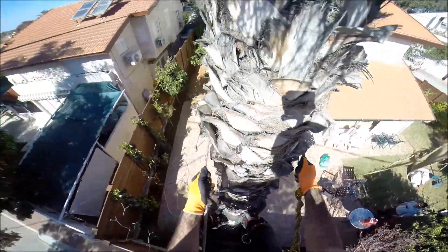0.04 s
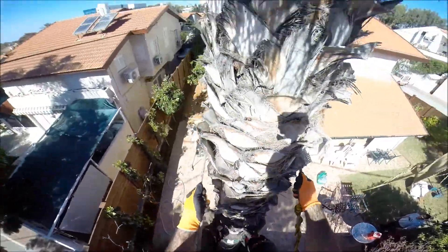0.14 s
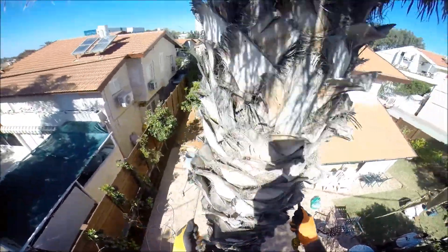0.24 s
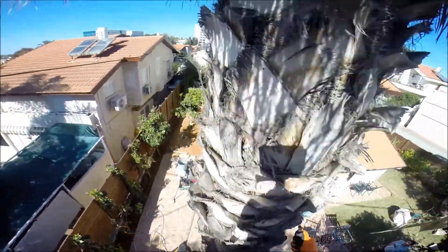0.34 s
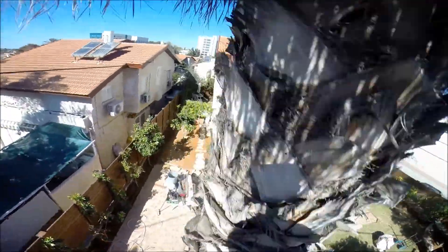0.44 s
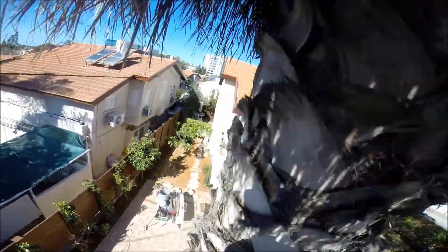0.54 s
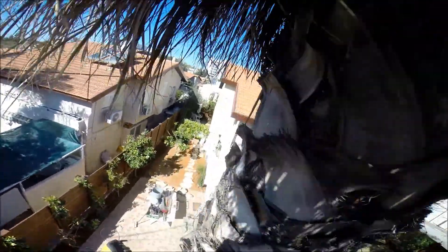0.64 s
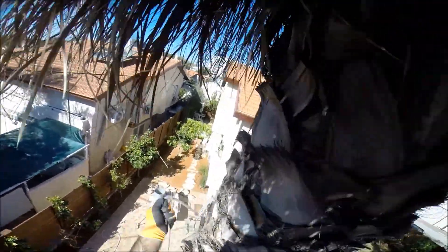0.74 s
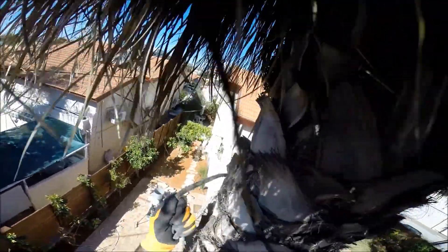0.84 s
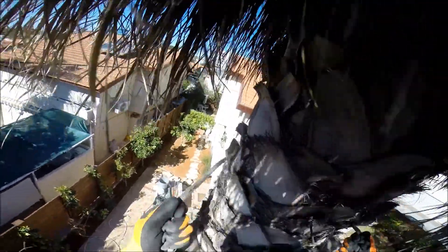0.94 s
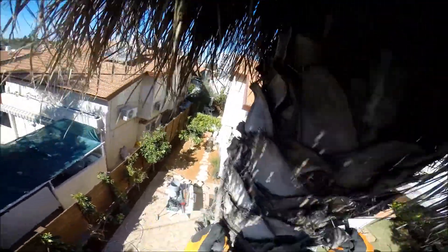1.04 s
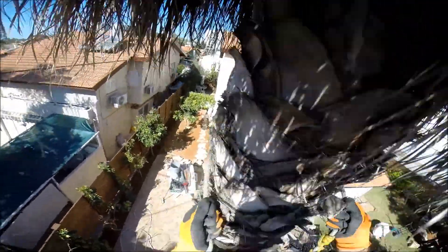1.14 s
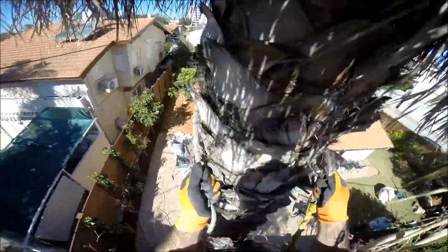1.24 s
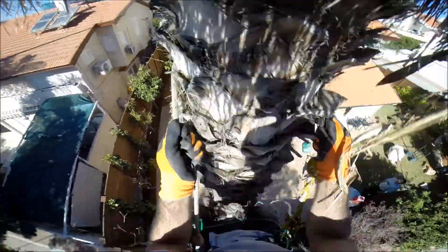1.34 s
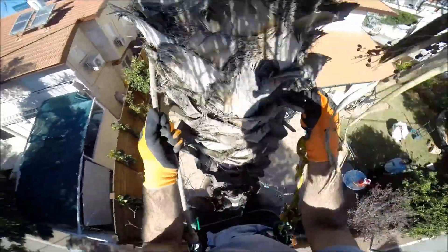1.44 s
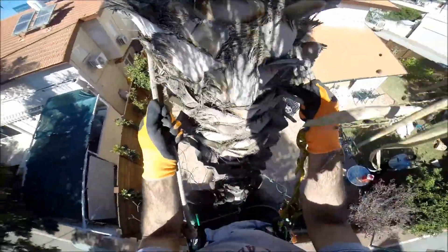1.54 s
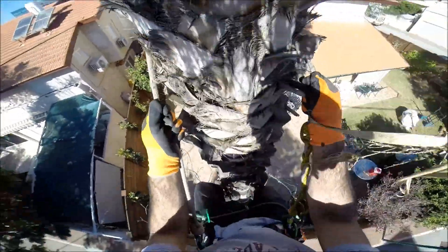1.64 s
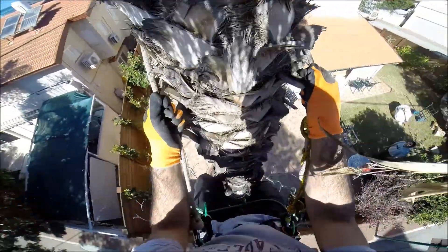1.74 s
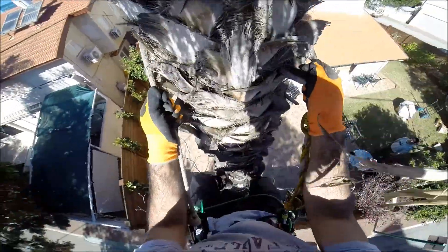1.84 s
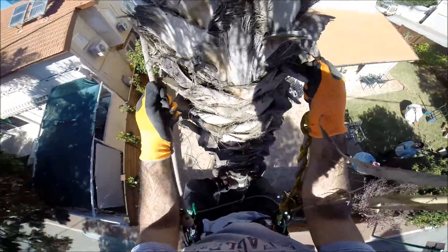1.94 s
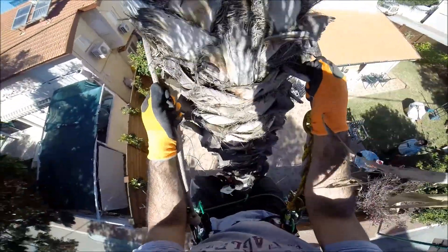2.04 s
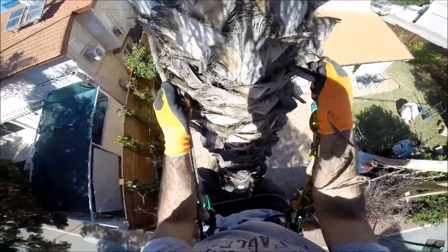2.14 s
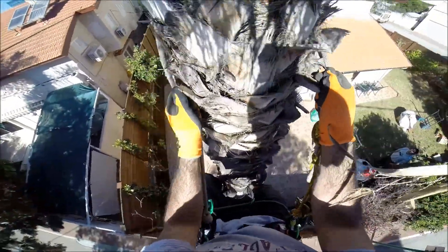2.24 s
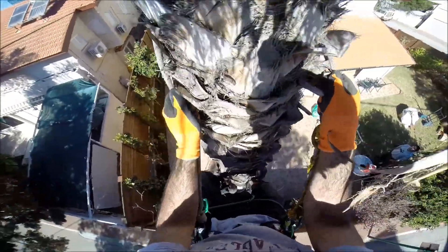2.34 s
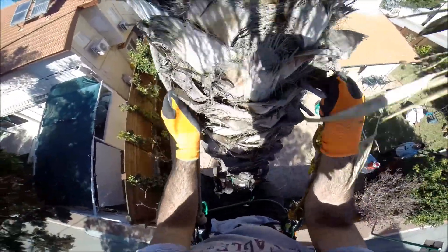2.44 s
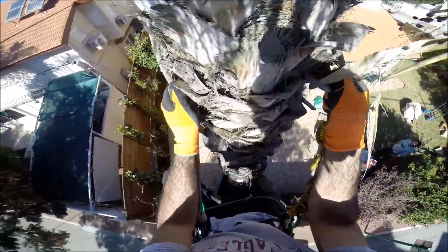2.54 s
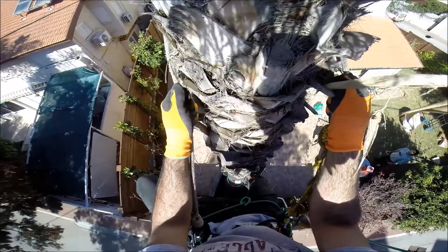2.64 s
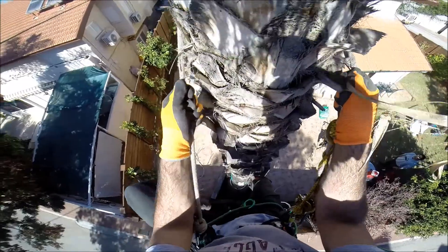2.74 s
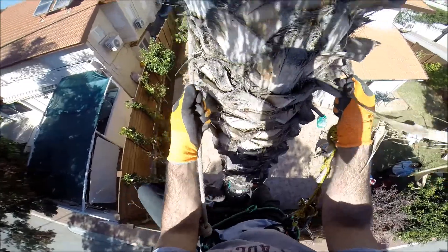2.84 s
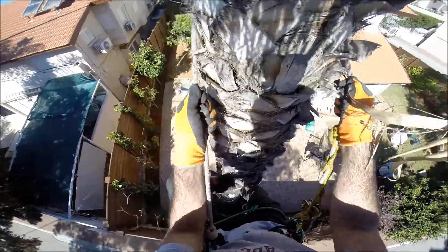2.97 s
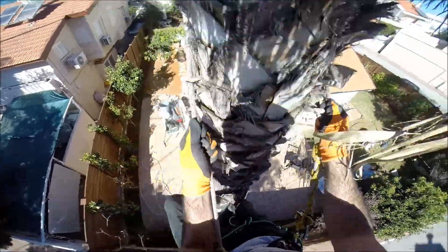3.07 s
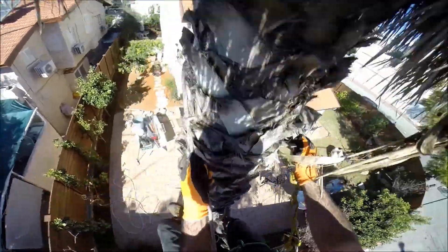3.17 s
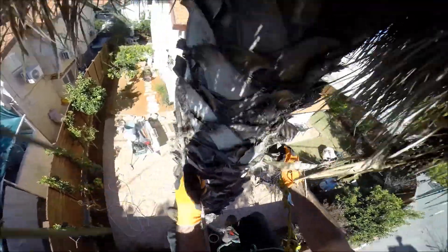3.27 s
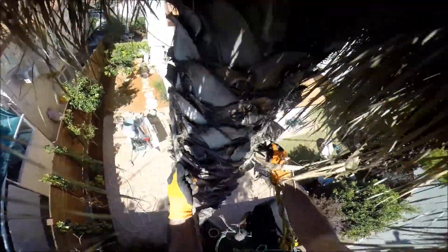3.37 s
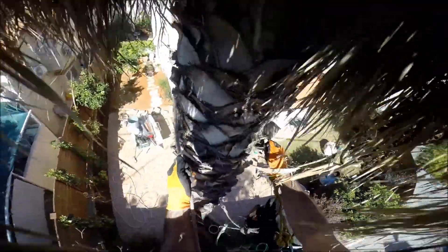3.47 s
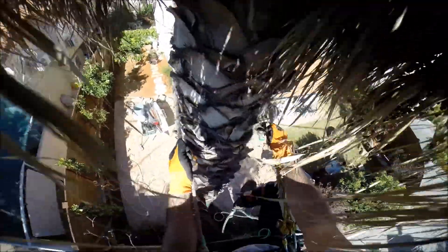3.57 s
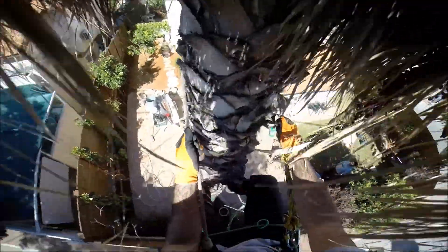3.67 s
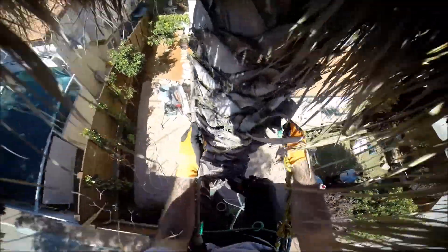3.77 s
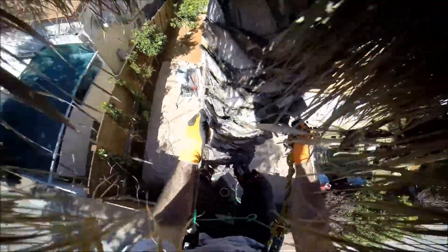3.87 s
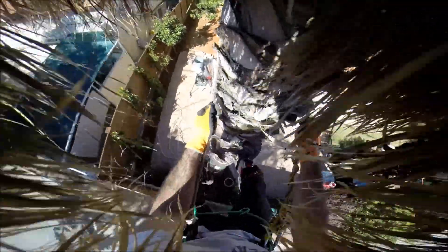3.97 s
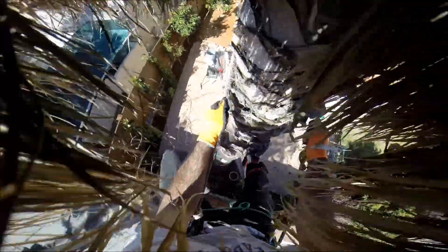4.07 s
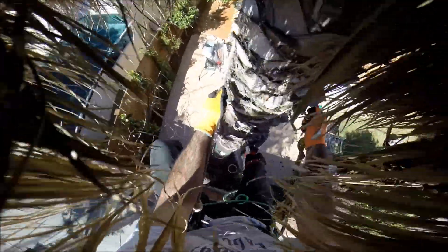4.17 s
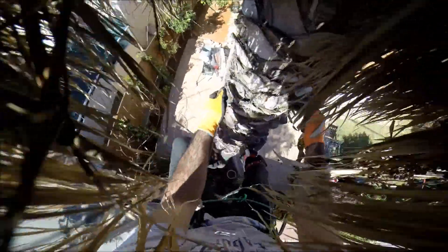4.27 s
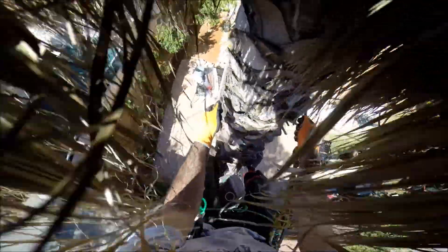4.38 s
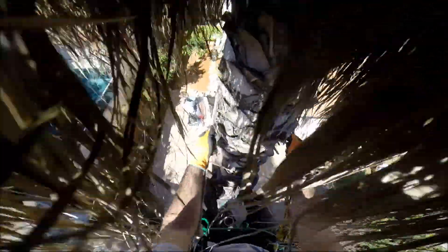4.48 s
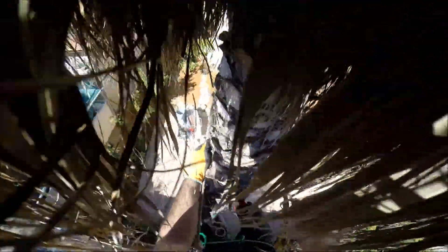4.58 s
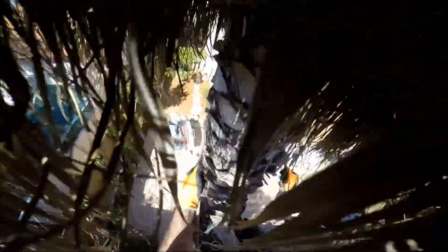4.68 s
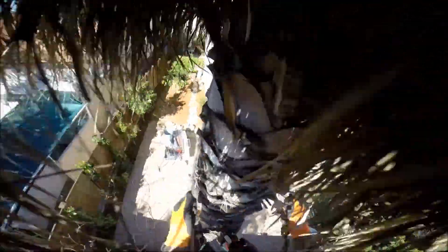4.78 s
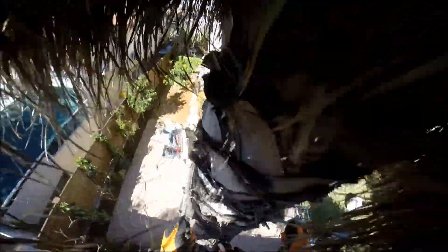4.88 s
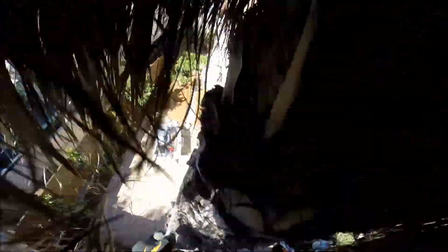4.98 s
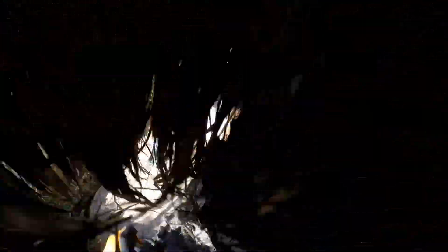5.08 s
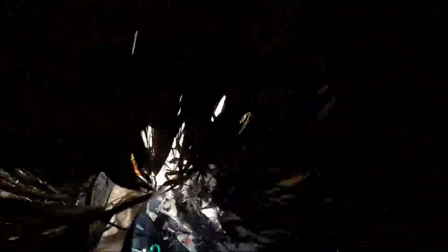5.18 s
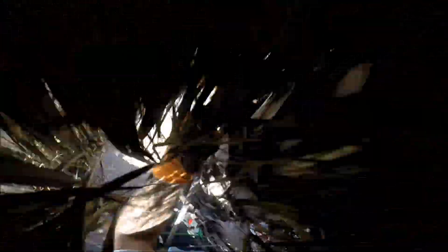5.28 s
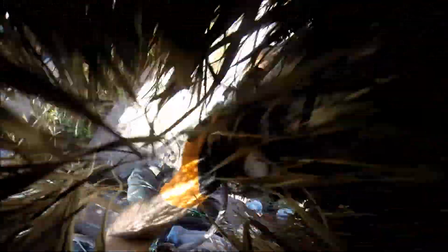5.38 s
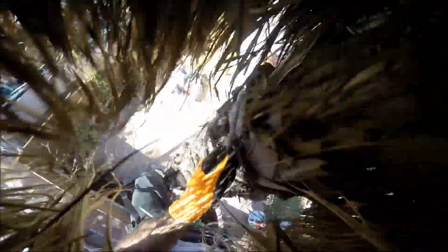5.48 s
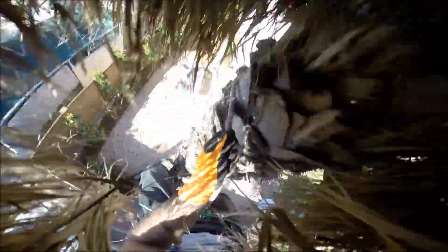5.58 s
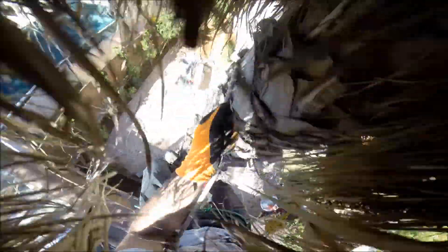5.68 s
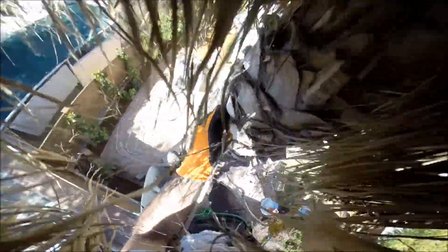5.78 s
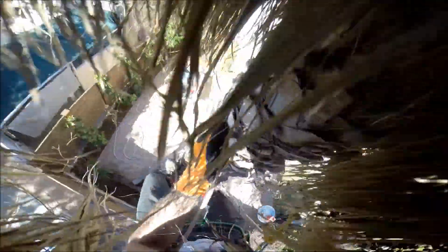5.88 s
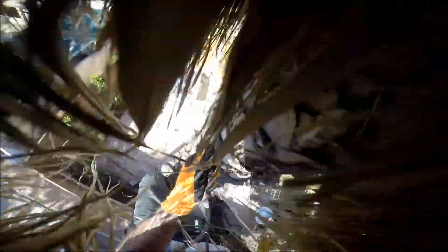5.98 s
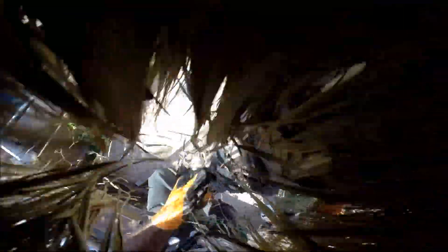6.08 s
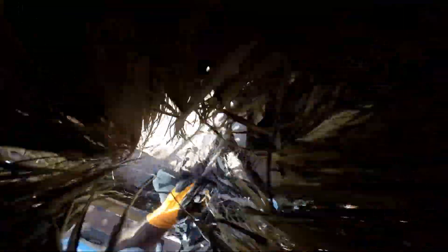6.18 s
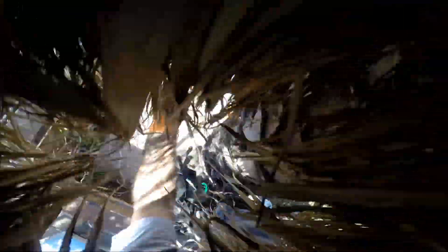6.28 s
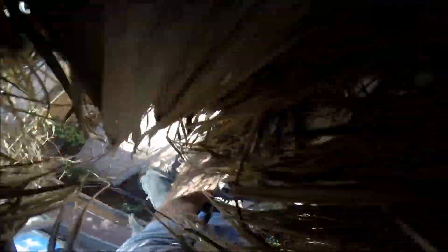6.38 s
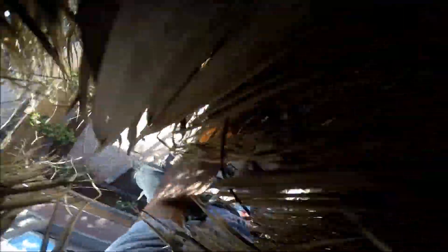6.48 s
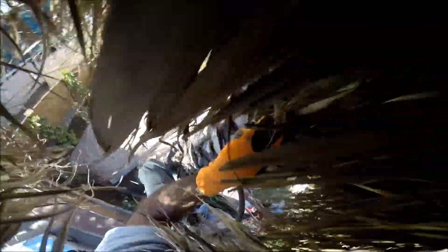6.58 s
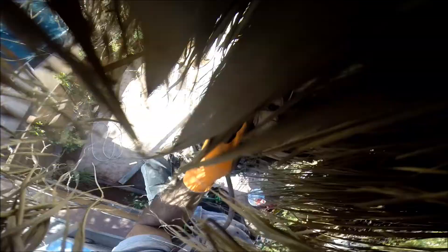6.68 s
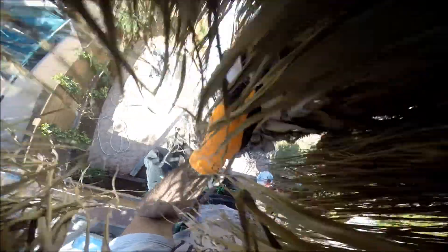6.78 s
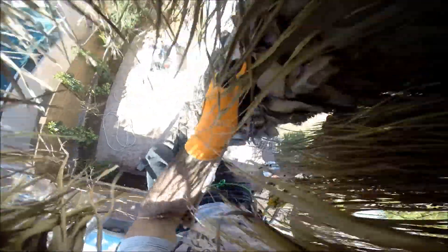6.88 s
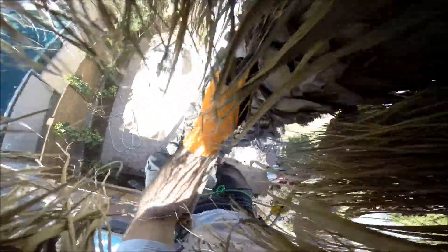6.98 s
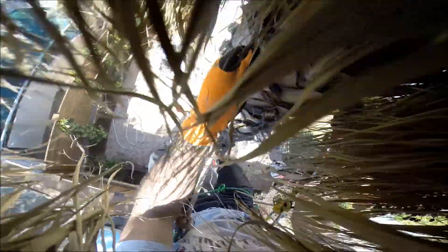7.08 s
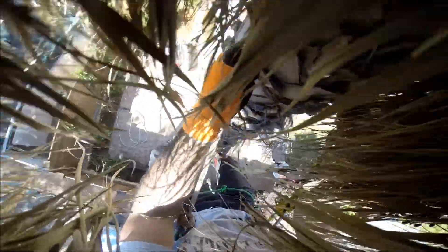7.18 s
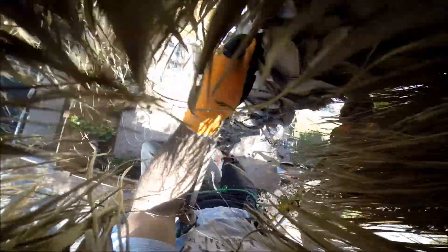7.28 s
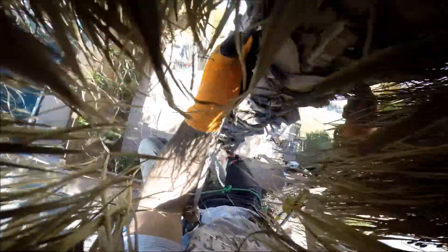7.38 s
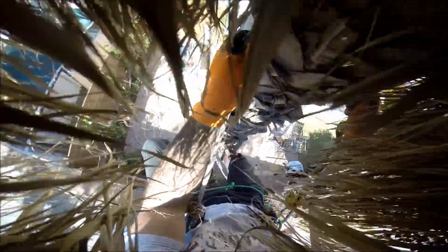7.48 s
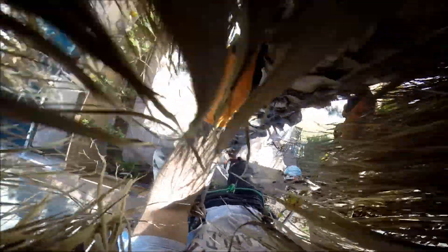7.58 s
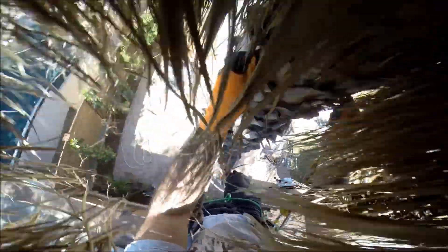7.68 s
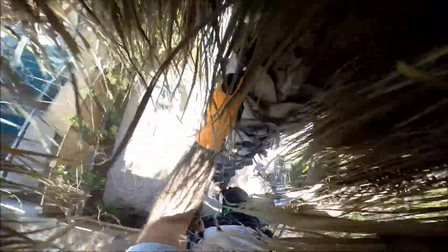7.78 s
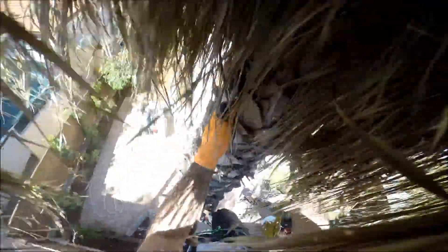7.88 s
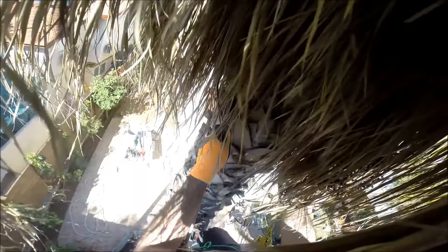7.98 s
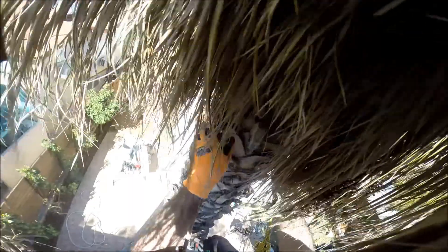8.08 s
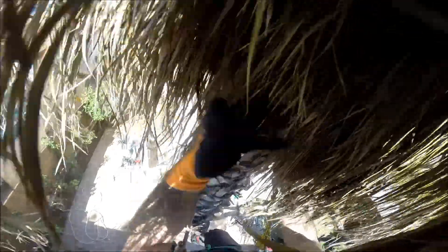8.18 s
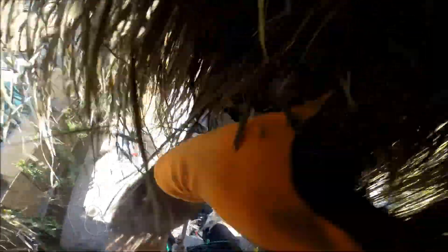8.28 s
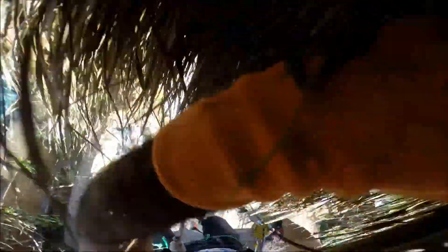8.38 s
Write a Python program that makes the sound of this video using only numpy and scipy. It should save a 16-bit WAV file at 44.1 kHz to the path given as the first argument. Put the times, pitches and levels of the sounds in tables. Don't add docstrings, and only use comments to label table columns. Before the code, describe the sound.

A quiet opening of soft low wind thumps and light twig taps is broken by a short burst of dry snaps, then settles again. Just after three seconds the microphone pushes into dead fronds: dense, uneven crunching and rustling, sharp cracks, thin bright ticks and hollow bumps, all extremely close, dry and outdoors, without any echo.

```python
import sys
import numpy as np
from scipy import signal
from scipy.fft import rfft, irfft
from scipy.io import wavfile
from scipy.ndimage import uniform_filter1d

SR = 44100
rng = np.random.default_rng(int(sys.argv[2]) if len(sys.argv) > 2 else 0)


def inscribe(sig):
    pcm = np.round(np.clip(np.atleast_2d(sig).T, -1, 1) * 32767)
    wavfile.write(sys.argv[1], SR, pcm.astype(np.int16))


def gain_from_db(level_db):
    decades = np.asarray(level_db, float) / 20
    return 10 ** decades


N = 371322

# frequency_hz, density_db (per Hz)
CASE_SHAPE = [(35, -33), (60, -3), (196, -14.5), (320, -9.5), (413, -15.5), (1070, -11.5), (1350, -6),
              (2250, -11), (4120, -19.5), (5840, -16), (11700, -38.5), (15500, -44)]
# frequency_hz, width_hz, peak_db
CASE_MODES = [(1750, 620, 2.5), (2250, 140, 10), (2725, 570, 11.5), (3380, 600, 6.5), (5600, 530, 2),
              (6840, 140, 6.5), (9100, 330, 6), (11600, 440, 6.5)]
BODY_TOP_HZ, TREBLE_FROM_HZ = 927, 3930
SPARK_DECAY_S = 0.00063


def level(x, db=0):
    return x * gain_from_db(db) / np.sqrt(np.mean(x ** 2))


def curve(table):
    s, *columns = np.transpose(table)
    return [np.interp(np.arange(N) / SR, s, column) for column in columns]


def power_sum(*levels_db):
    return 10 * np.log10(sum(gain_from_db(db) ** 2 for db in levels_db))


def colour(x, shape, modes=(), size=4096):
    hz = np.fft.rfftfreq(size, 1 / SR) + 1
    shape_hz, shape_db = np.transpose(shape)
    db = np.interp(np.log(hz), np.log(shape_hz), shape_db)
    db = db + sum(peak_db / (1 + (2 * (hz - f) / width) ** 2) for f, width, peak_db in modes)
    ceps = irfft(db * np.log(10) / 20)
    ceps[1:size // 2] *= 2
    ceps[size // 2 + 1:] = 0
    response = irfft(np.exp(rfft(ceps)))
    return signal.oaconvolve(x, response)[:len(x)]


def band(x, lo_hz, hi_hz):
    edges_hz = [lo_hz, min(hi_hz, .45 * SR)]
    return signal.sosfilt(signal.butter(3, edges_hz, "band", fs=SR, output="sos"), x)


def walk(rate):
    k = int(SR / rate)
    steps = np.repeat(rng.standard_normal(N // k + 1), k)
    return 0.58 * uniform_filter1d(steps, k)[:N]


def crackle(per_s, spread_db, tail_s):
    sizes_db = np.minimum(spread_db * rng.exponential(size=N), 3.3 * spread_db)
    slips = (rng.random(N) < per_s / SR) * gain_from_db(sizes_db)
    power = signal.lfilter([1], [1, -np.exp(-1 / (tail_s * SR))], slips ** 2)
    return level(np.sqrt(power) * rng.standard_normal(N))


def add_at(out, s, sound):
    out[int(s * SR):][:len(sound)] += sound


def swell(s, held_ms, db, rise_ms, fall_ms):
    ms = 1000 * (np.arange(0, N, 32) / SR - s)
    before = -ms / max(rise_ms, 1)
    after = (ms - held_ms) / max(fall_ms, 1)
    return db - 10 * np.maximum(before, after).clip(0, 20)


def movements(rows, rest_db):
    coarse = power_sum(*(swell(*row) for row in rows))
    return power_sum(np.interp(np.arange(N) / 32, np.arange(len(coarse)), coarse), rest_db)


def gusts():
    gust_rows = [(0, -28.5, .05, 0), (.25, -25, 0, 0.2), (.85, -27, 0.5, 0.4), (1.46, -33, 0, 0.3),
                 (1.58, -26, 0, 0.18), (2.3, -30.5, 0.8, 1.5), (3.05, -20.5, -0.04, 0.05),
                 (3.261, -10, 0, -0.04), (3.3, -30.5, 0.5, 0.23), (3.82, -42, -1.5, 0.5),
                 (4.08, -28.5, 0.3, 0.1), (4.48, -31.5, 0.2, 0.1), (4.74, -35, -0.5, 0),
                 (5.15, -27, 0.2, 0.5), (6.21, -26.5, 0.08, 0.32), (6.7, -33, -1.8, 0.5),
                 (7.35, -39, 0.3, -0.15), (7.9, -27.5, 0.2, 0.32)]
    rows = [(s, 0, db, 1000 * rise, 1000 * fall) for s, db, rise, fall in gust_rows]
    return movements(rows, rest_db=-69)


def air():
    # frequency_hz, density_db (per Hz)
    gust_shape = [(12, -38.5), (20, 4), (37, 2.5), (52, -1.5), (70, -11.5), (110, -26), (200, -65)]
    # frequency_hz, density_db (per Hz)
    hiss_shape = [(65, -34), (110, 6.5), (680, -7), (1240, -13), (2000, -17.5), (3150, -9.5), (3790, -14.5),
                  (12100, -31), (15500, -39)]
    # pitch_hz, level_db
    tones = [(11710, -77), (14630, -85)]
    enter_s, jolt_pace = 3.2, 1.51

    push = rng.standard_normal(N)
    heave = level(colour(push, gust_shape, size=16384))
    quicker = [(hz * jolt_pace, db) for hz, db in gust_shape]
    jolt = level(colour(push, quicker, size=16384))
    wind = np.where(np.arange(N) / SR < enter_s, heave, jolt)
    wind = level(wind * gain_from_db(2.5 * walk(9.0)))

    hiss = level(colour(rng.standard_normal(N), hiss_shape), -53)
    whine = 0
    for hz, db in tones:
        phase = 2 * np.pi * np.cumsum(hz + 8 * walk(60)) / SR
        whine = whine + np.sqrt(2) * gain_from_db(db) * np.sin(phase)
    return uniform_filter1d(gain_from_db(gusts()), size=1000) * wind + hiss + whine


def leaflets(patchy_db, own):
    shared = crackle(per_s=460., spread_db=5.0, tail_s=0.0024)
    stalks = crackle(per_s=300., spread_db=2.0, tail_s=0.005)
    out = band(.5 * shared + 1.36 * stalks, 59, 613)
    for hz in 630 * 2 ** np.arange(1 / 6, 4.9, 1 / 3):
        spread_db = 2.0 + 1.5 * np.log2(hz / 1340.0).clip(0)
        tips = crackle(per_s=400., spread_db=spread_db, tail_s=0.0019 + 2. / hz)
        leaf = band(shared + own * tips, hz / 2 ** (1 / 6), hz * 2 ** (1 / 6))
        out = out + gain_from_db(patchy_db * walk(22)) * leaf
    return out


def case_ring(slips, flat):
    # frequency_hz, width_hz, peak_db
    flat_modes = [(1660, 340, 13.5), (2250, 330, 6), (3300, 750, 9), (4580, 150, 13.5), (5530, 840, 12),
                  (6900, 120, 9), (9120, 600, 7), (11460, 700, 8)]
    shift = 0.034
    under_flat = np.sqrt(flat) * level(colour(slips, CASE_SHAPE, flat_modes))

    def ringing(k):
        modes = [(hz * k, width, db) for hz, width, db in CASE_MODES]
        return np.sqrt(1 - flat) * level(colour(slips, CASE_SHAPE, modes)) + under_flat

    press = np.clip(.5 + walk(5), 0, 1)
    return level(press * ringing(1 - shift) + (1 - press) * ringing(1 + shift))


def fronds():
    # start_s (of full level), held_ms,
    # level_db, rise_ms (per 10 dB), fall_ms (per 10 dB)
    stroke_rows = [(.172, 35, -40.5, -1.5, 7), (.22, 0, -51, 5, 60), (.396, 0, -44.5, 110, 65),
                   (.597, 55.5, -45.5, -1.5, 30), (.67, 89, -37.5, 20, 0), (.77, 125, -51, 11, 110),
                   (1.02, 21.5, -35, 56, 18), (1.09, 23.5, -18.5, 3.5, 3), (1.186, 3, -23, 2, 12),
                   (1.12, 217, -26, 3, 5), (1.227, 19, -22.5, 28, 40), (1.35, 170, -39, 17, 50),
                   (1.585, 7, -27.5, 53, 15), (1.643, 5, -33, 15, 5), (1.66, -4, -38, 17, 193),
                   (2.307, 10, -37, 91, 94), (2.585, -9, -36.5, 402, 488), (2.895, -3, -42, 50, 30),
                   (3.025, 34, -39, 18, 25), (3.2, 29, -37, 97.5, -1),
                   (3.237, 0, -9, -0.5, 13), (3.4, 6, -14, 57, 54), (3.33, 392, -18.5, 69, 95),
                 (3.901, 262, -14.5, 43, 6), (4.17, 30, -24, 14, 50), (4.4, 145, -17, 92, 5),
                 (4.57, 69, -16.5, 12, -1), (4.64, -0.5, -13, 1, 12), (4.991, 161, -15, 202, 207),
                 (5.402, 82, -19.5, 5, 174), (5.663, 94, -18, 40.5, 125), (5.802, -4, -17.5, 1, 56),
                 (6.005, 60, -21, 35, 8), (6.038, 10.5, -12.5, 14, 16), (6.097, 8.5, -10.5, 4, -1),
                   (6.185, 115, -15, 35, 8.5), (6.438, 33, -14.5, 48, 18), (6.691, 29, -14, 9, 15),
                  (6.6, 76.5, -22.5, 83, 31.5), (6.75, 119, -20, 45, 127), (7.12, 79.5, -19, -1, 9),
                  (7.237, 3, -20.5, 32, 89), (7.3, 51.5, -17.5, 34, 4), (7.393, 58, -20, 24, 12),
                  (7.46, 28, -19.5, 27, 10), (7.55, 85, -18.5, 30, 32), (7.637, 22, -12.5, 29, 8.5),
                  (7.675, 28, -21, 10, 10), (7.799, 87, -14.5, 31, 168), (8.36, 73, -23, 18, 12),
                  (8.396, 22, -18.5, 16, 34)]
    # start_s, rustle_db (between strokes), brittle_db (treble over scrape),
    # flat_db (ring of the case under flat leaves)
    skirt = [(0, -63, 1, -10.5), (.2, -69.5, -2.5, -14), (.62, -48, -14.5, -1), (.75, -43.5, -1.5, 14),
             (.8, -43.5, -9.5, 2), (1.25, -41, -7, -4.5), (1.6, -39.5, -8.5, -18), (2.0, -54, -8, -12.5),
             (3.22, -49, -10, -16.5), (3.27, -29.5, -5, -8), (4.3, -27.5, -10, -4.5),
             (5.95, -29.5, -6.5, -3.5), (6.2, -24, -10, 4.5), (6.5, -29, -9.5, -2.5),
             (7.08, -40.5, -7.5, -1.5), (7.17, -30, -3, 2), (7.25, -30.5, -11, 4.5), (7.35, -34, 1, 0),
             (7.45, -36, -8, 0), (7.7, -20, -13, 3.5), (7.85, -37, -6, -7.5)]
    # frequency_hz, density_db (per Hz)
    gear_shape = [(65, -47), (110, -14), (257, -27.5), (680, -21.5), (1350, -13), (1800, -19),
                  (2210, -17.5), (3790, -25.5), (5860, -20), (14300, -41.5), (15500, -29)]
    # frequency_hz, width_hz, peak_db
    gear_modes = [(324, 33, 18), (897, 120, 8), (1370, 360, 7), (2250, 130, 9), (2650, 140, 8),
                  (3050, 760, 12), (4520, 400, 6), (5670, 370, 3.5)]

    rest_db, brittle_db, flat_db = curve(skirt)
    scrape_db = movements(stroke_rows, rest_db)
    outside = np.arange(N) / SR <= 3.23
    body_db = power_sum(scrape_db - 17.5, gusts() - 0.5 - 40 * outside, -60)
    touch = np.clip((scrape_db + 36.5) / 3, 0, 1)
    flat = np.clip((flat_db + 8) / 9.5, 0, 1)

    slips = gain_from_db(2.0 * walk(25) + 0.75 * walk(90)) * leaflets(patchy_db=3.5, own=1.0)
    near = case_ring(slips, flat)
    below = level(gain_from_db(3.0 * walk(14)) * colour(slips, gear_shape, gear_modes))
    heard = np.sqrt(touch) * near + np.sqrt(1 - touch) * below

    low = level(band(heard, 76, BODY_TOP_HZ), 1.0)
    mid = level(band(heard, BODY_TOP_HZ, TREBLE_FROM_HZ), -1.24)
    top = band(heard, TREBLE_FROM_HZ, 7770.0)
    sizzle_db = 0.6 * (brittle_db + 11.5) + 0.17 * (scrape_db + 19.5)
    sizzle = gain_from_db(sizzle_db) * band(heard, 9320.0, 14700)
    stray_sparks = crackle(per_s=60., spread_db=6.0, tail_s=SPARK_DECAY_S)
    stray = level(band(stray_sparks, 5000, 12500), -26)
    treble = gain_from_db(brittle_db) * (level(top + sizzle, -1.3) + touch * stray)
    return gain_from_db(scrape_db) * (mid + treble) + gain_from_db(body_db) * low


def crack(hz, t60, ring_s):
    t = np.arange(1536) / SR
    decay = np.exp(-np.log(1000) * t / t60)
    burst = rng.standard_normal(1536) * decay * np.minimum(t / 0.000067, 1)
    rung = np.convolve(burst, np.sin(2 * np.pi * hz * t) * np.exp(-t / ring_s))[:len(t)]
    return colour(burst, CASE_SHAPE, CASE_MODES, size=1024), rung / abs(rung).max()


def snaps():
    # start_s, peak_db, pitch_hz
    flick_rows = [(0.0387, -32.5, 6070), (0.237, -32, 4390), (0.366, -31, 6300), (0.3987, -31, 7800),
                  (0.658, -27, 4670), (0.6747, -17, 6840), (0.7444, -12, 4900), (1.059, -11, 4100),
                  (1.1206, -12, 3840), (1.144, -12, 5500), (1.2498, -9.5, 4680), (1.5579, -19, 4670),
                  (2.551, -29, 4930), (2.7194, -21, 4760), (3.041, -20, 4900), (3.57, -2.5, 5900),
                  (3.665, -8, 6280), (4.1613, -7, 5660), (5.5803, -8, 5800), (6.476, -12, 7500),
                  (7.355, -1.5, 5640), (7.6786, -9.5, 5740)]
    # start_s, peak_db, pitch_hz
    pop_rows = [(0.198, -16.5, 3240), (0.602, -24.5, 1370), (1.025, -16, 1170), (1.024, -12, 2680),
                (1.068, -7, 3900), (1.213, -9, 2620), (1.2288, -8, 2750), (1.6396, -15, 2200),
                (3.2332, -6.5, 2740), (3.261, -3, 2780), (3.923, -1.5, 1710), (3.9462, -1, 2200),
                (4.3224, -8, 2640), (4.903, -8, 1690), (4.928, -2.5, 2250), (5.0647, -3.5, 2650),
                (5.289, -5, 1560), (5.461, -13, 2170), (6.2551, -1, 1850), (7.6502, -12, 1700),
                (7.7976, -2, 2250), (8.122, -1, 1990), (8.157, -8, 1810), (8.19, -12.5, 2300),
                (8.393, -1, 2360)]
    # start_s, peak_db, pitch_hz
    snap_rows = [(1.07, -3, 2900), (1.089, -8, 2600), (1.132, -5, 2650), (1.1867, -10.5, 1850),
                 (1.292, -14, 1850), (3.287, -2, 2920), (3.683, -6, 2330), (3.904, -6, 1640),
                 (4.54, -4.5, 2280), (4.6395, -5.5, 1750), (5.489, -10, 1900), (5.505, -6, 2700),
                 (5.5412, -6, 3280), (5.5609, -8.5, 3240), (5.5782, -2.5, 2700), (5.7045, -4, 1610),
                 (5.8065, -8, 2340), (6.013, -5, 2650), (6.039, -9, 1610), (6.69, -2, 1700),
                 (7.9982, -1, 3010), (8.05, -7, 2340), (8.38, -9, 1790)]
    out, t = np.zeros(N + 1536), np.arange(1536) / SR
    for rows, treble_db in ((snap_rows, -4.5), (pop_rows, -47)):
        for s, peak_db, hz in rows:
            whole, rung = crack(hz, t60=.013, ring_s=.0013)
            spit = band(whole, TREBLE_FROM_HZ, 14500) * np.exp(-t / 0.0035)
            whole = band(whole, 1000, 9500)
            hit = rung + 0.24 * whole / abs(whole).max()
            hit = hit + gain_from_db(treble_db + 4.5) * spit / abs(spit).max()
            add_at(out, s, gain_from_db(peak_db - 1.0) * hit)
    for s, peak_db, hz in flick_rows:
        whole, rung = crack(hz, t60=0.02, ring_s=0.0017)
        edge = np.diff(whole, prepend=0)
        add_at(out, s, gain_from_db(peak_db - 6.0) * (0.45 * rung + 1.26 * edge / abs(edge).max()))
    return out[:N]


def heaves():
    heave_rows = [
        (.04, -27, 42),
        (.225, -17, 34),
        (0.689, -16, 38.3),
        (.815, -21, 31),
        (2.76, -22, 40.5),
        (3.118, -11.5, 36.7),
    ]
    t = np.arange(N) / SR
    out = np.zeros(N)
    for s, db, hz in heave_rows:
        envelope = np.exp(-((t - s) * hz / 0.92) ** 2)
        out += gain_from_db(db) * np.sin(2 * np.pi * hz * (s - t)) * envelope
    return out


def sparks():
    # start_s, peak_db
    spark_rows = [(0.17, -40), (0.7437, -24), (1.0236, -29), (1.0562, -14), (1.0884, -22), (1.132, -20),
                  (3.234, -32), (3.2605, -28), (3.2864, -20), (3.344, -21), (3.4501, -24), (3.4994, -10.5),
                  (3.5693, -12), (3.6651, -14), (3.9032, -10), (3.9654, -19), (4.1604, -13), (4.639, -21),
                  (5.4829, -22), (5.5119, -25), (5.56, -22), (5.5787, -12), (5.6575, -26), (6.0382, -24),
                  (6.1025, -29), (6.2841, -20), (6.4318, -21), (6.7965, -24), (7.1237, -27), (7.3043, -19),
                  (7.3482, -12), (7.6779, -34), (7.9189, -18), (8.121, -29), (8.3569, -31), (8.3814, -26)]
    out, t = np.zeros(N + 256), np.arange(256) / SR
    for s, peak_db in spark_rows:
        add_at(out, s, gain_from_db(peak_db + 1.5) * rng.standard_normal(256) * np.exp(-t / SPARK_DECAY_S))
    return band(out[:N], 6500, 12800)


def ticks(rows, burst_s, ring_cycles, edge, under_db):
    out, bright, t = np.zeros(N + 1024), np.zeros(N + 1024), np.arange(1024) / SR
    for s, peak_db, hz in rows:
        burst = rng.standard_normal(1024) * np.exp(-t / burst_s)
        pole = np.exp((2j * np.pi - 1 / ring_cycles) * hz / SR)
        rung = signal.lfilter([1], [1, -pole], burst).imag
        gain = gain_from_db(peak_db - under_db)
        add_at(out, s, gain * rung / abs(rung).max())
        add_at(bright, s, gain * burst)
    through_case = colour(bright[:N], CASE_SHAPE, CASE_MODES, size=1024)
    through_case = band(through_case, BODY_TOP_HZ, 14000)
    return out[:N] + edge * (through_case + .03 * band(bright[:N], 9200, 15000))


def twigs():
    # start_s, peak_db, pitch_hz
    tap_rows = [(0.178, -24, 3240), (0.4893, -36.5, 3180), (0.6374, -28, 1260), (0.6504, -33, 1290),
                (0.6719, -30, 1610), (0.7228, -25, 1390), (0.7427, -22, 3240), (0.9233, -25.5, 1300),
                (0.9562, -25, 1280), (1.3794, -26, 1440), (1.4072, -18.5, 1360), (1.488, -22, 1310),
                (1.5569, -20, 1330), (1.5823, -15.5, 1370), (2.2603, -22, 2270), (2.3042, -29, 1370),
                (2.4473, -30, 1320), (2.5222, -28, 2190), (2.588, -22, 2660), (2.7048, -28, 1360),
                (2.7192, -22, 3200), (2.7402, -22, 2230), (2.8624, -30, 2160), (2.8769, -23.5, 1355),
                (2.8893, -22.5, 2150), (3.1587, -32, 1270), (3.1757, -23, 1310)]
    # start_s, peak_db, pitch_hz
    crack_rows = [(1.0574, -8, 1530), (1.068, -7, 2900), (1.1003, -6, 1560), (1.1214, -8, 2740),
                  (3.3107, -10, 1250), (3.3638, -13, 2650), (3.3985, -5, 2670), (3.4508, -9, 1520),
                  (3.49, -9, 2230), (3.5006, -2.5, 2300), (3.7244, -2, 2250), (4.0302, 1, 2550),
                  (4.0527, -1, 2360), (4.124, -3, 2870), (4.159, -3, 1750), (4.359, -9, 1650),
                  (4.4305, -1, 2270), (4.528, -4, 1660), (4.5797, -8, 1610), (4.6394, 1.5, 2400),
                  (4.8377, -4, 1690), (4.8707, -4.5, 1680), (4.933, 0, 2250), (4.9865, -11, 2330),
                  (5.0233, -5, 1640), (5.0648, -4, 2640), (5.1038, -2, 1330), (5.1265, -7, 1600),
                  (5.247, -3.5, 2340), (5.4839, -4, 1700), (5.679, -14, 1660), (5.7229, -6, 2390),
                  (5.804, -10, 2220), (6.046, -1, 1670), (6.094, -3, 1730), (6.103, 5, 1680),
                  (6.1769, -5, 1640), (6.2023, -2, 1640), (6.271, 2, 1790), (6.2875, -11, 1680),
                  (6.4333, -6, 1700), (6.8319, -15, 2920), (6.8536, -10, 2160), (7.156, -16, 1680),
                  (7.2689, -10, 1640), (7.4122, -11.5, 1600), (7.6473, -8, 1550), (7.7762, -9, 1660),
                  (7.801, -3, 2280), (7.8511, -2, 2300), (7.919, 0, 2250), (8.0074, -3, 1670),
                  (8.33, -15, 2700), (8.3582, -5.5, 1830)]
    # start_s, peak_db, pitch_hz
    thud_rows = [(1.132, -12, 920), (1.21, -16.5, 605), (1.248, -23.5, 584), (2.718, -27, 875),
                 (3.017, -30, 835), (3.963, -10, 740), (4.418, -17, 490), (5.059, -18, 665),
                 (5.289, -10.5, 750), (5.401, -11.5, 740), (5.659, -12, 900), (6.04, -16.5, 500),
                 (6.253, -15, 258), (6.269, -25, 202), (8.118, -15.5, 859), (8.154, -24, 853),
                 (8.272, -23, 800), (8.309, -23, 900)]
    # start_s, peak_db, pitch_hz
    tip_rows = [(3.021, -28, 4500), (3.031, -26, 4700), (3.051, -28, 4400), (3.4508, -8, 5940),
                (3.5002, -11, 5600), (3.7904, -6.5, 5100), (3.9038, -8, 4470), (3.926, -12, 5310),
                (3.9998, -7, 4970), (4.0582, -8, 4960), (4.4095, -8, 6100), (4.518, -8, 5280),
                (5.0255, -5, 5050), (5.089, -9, 5090), (5.3877, -21, 5530), (5.4829, -13, 6960),
                (5.5124, -16, 5880), (5.684, -10, 5610), (6.0392, -3, 6960), (6.103, -4, 5370),
                (6.255, -13, 6800), (6.4318, -14, 5740), (6.6947, -12, 5180), (6.7115, -7, 5330),
                (6.797, -18, 4640), (7.1583, -8, 6660), (7.3203, -7, 5540), (7.889, -10, 5640),
                (7.9189, -10, 5430), (8.122, -13.5, 4220), (8.1559, -20, 4140), (8.358, -18, 5830),
                (8.3847, -11, 6180)]
    # start_s, peak_db, pitch_hz
    ring_rows = [
        (7.318, -8, 5600),
        (7.6, -18, 1700),
        (7.632, -16, 1650),
        (7.647, -2, 1613),
    ]
    return (ticks(tap_rows, burst_s=0.0035, ring_cycles=9.6, edge=.15, under_db=5.0)
            + ticks(crack_rows, burst_s=.0012, ring_cycles=4.0, edge=1.9, under_db=3.5)
            + ticks(thud_rows, burst_s=0.0016, ring_cycles=1.8, edge=.3, under_db=2.0)
            + ticks(tip_rows, burst_s=0.0012, ring_cycles=4.4, edge=0.75, under_db=2.0)
            + ticks(ring_rows, burst_s=0.0055, ring_cycles=11.0, edge=0.26, under_db=3.5))


def knocks():
    # start_s, peak_db, pitch_hz
    knock_rows = [(.325, -36, 320), (1.4, -26, 310), (3.256, -15, 208), (4.054, -2.5, 89),
                  (6.037, -17.5, 138), (6.214, -13.5, 92), (6.2193, 0, 287), (6.299, 3, 199),
                  (6.367, -13, 130), (7.797, -9, 307), (7.883, -7.5, 123), (8.363, -13.5, 142)]
    out, t = np.zeros(N + 2048), np.arange(2048) / SR
    for s, peak_db, hz in knock_rows:
        add_at(out, s, gain_from_db(peak_db - 2.5) * np.sin(2 * np.pi * hz * t) * np.exp(-t * hz / 0.61))
    return band(out[:N], 38, 4000)


def creak():
    # start_s, level_db, pitch_hz
    creak_rows = [
        (3.09, -52, 1240),
        (3.15, -42, 1320),
        (3.234, -30, 1290),
        (3.29, -24, 1200),
        (3.34, -31, 1210),
    ]
    t = np.arange(N) / SR
    taut = (t > creak_rows[0][0]) & (t < creak_rows[-1][0])
    db, hz = curve(creak_rows)
    slips = band(crackle(per_s=670.0, spread_db=4.5, tail_s=0.0028), 14, 170)
    return taut * gain_from_db(db) * level(slips * np.sin(2 * np.pi * np.cumsum(hz) / SR))


def scene():
    at_case = air() + fronds() + snaps() + heaves()
    return (at_case + sparks() + twigs() + knocks() + creak())[None]


def band_limit(x):
    return signal.sosfilt(signal.butter(12, 16480, fs=SR, output="sos"), x)


def record(dry):
    soft = dry / (1 + abs(dry / 1.05) ** 4) ** .25
    mix = signal.sosfilt(signal.ellip(10, .3, 60, 15250, fs=SR, output="sos"), soft)
    return band_limit(mix)


dry = scene()
out = record(dry)
inscribe(out)
```